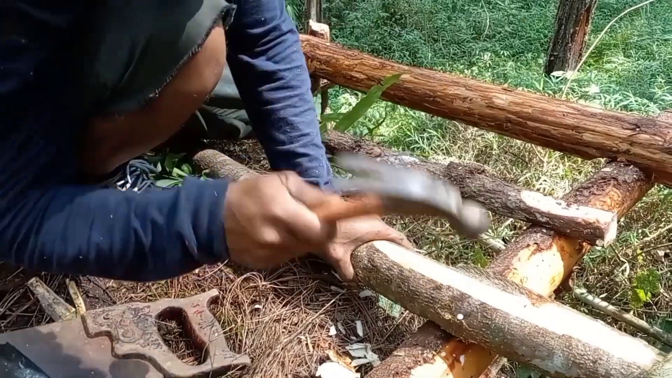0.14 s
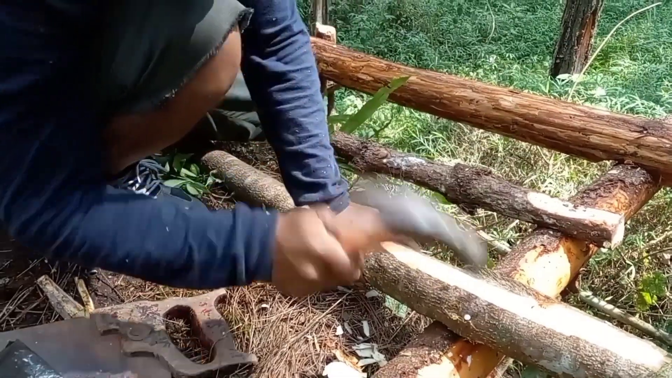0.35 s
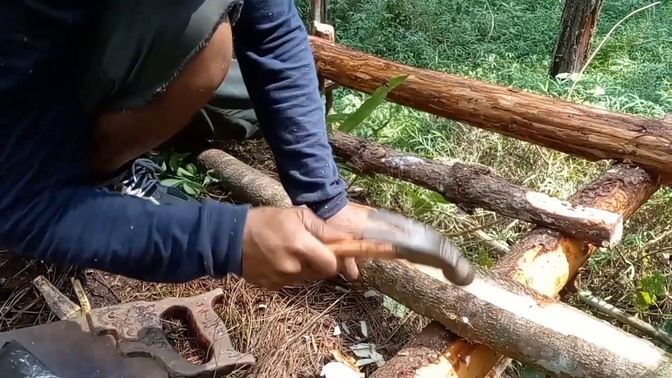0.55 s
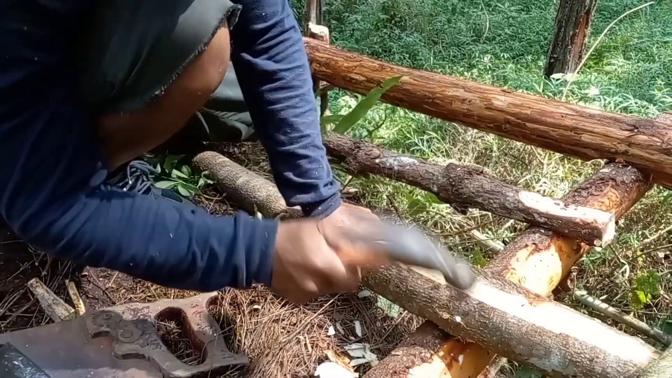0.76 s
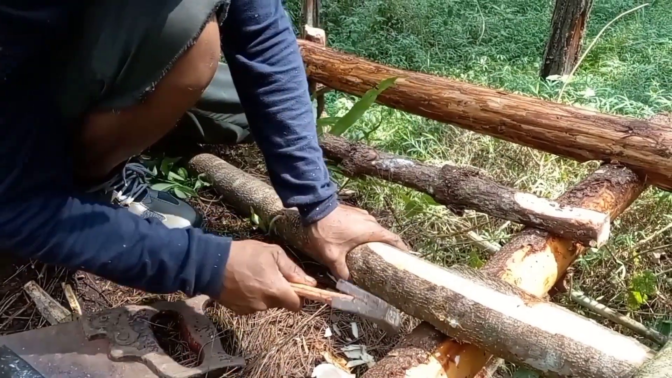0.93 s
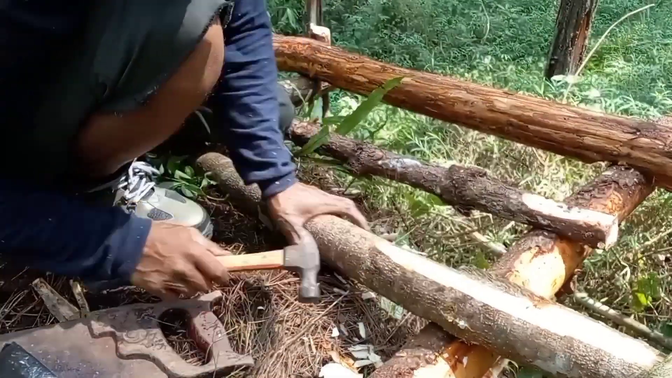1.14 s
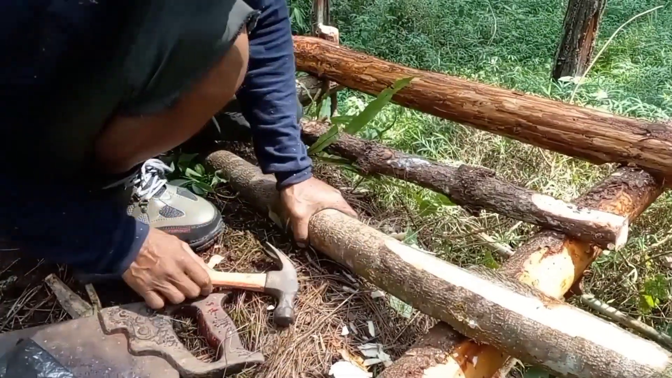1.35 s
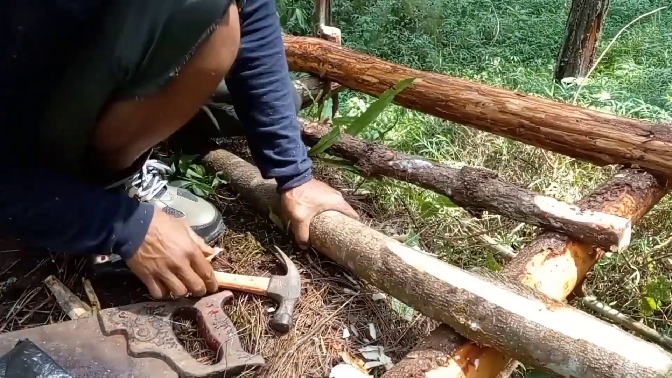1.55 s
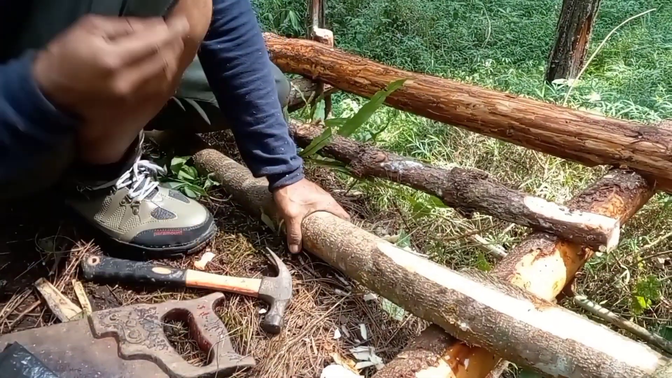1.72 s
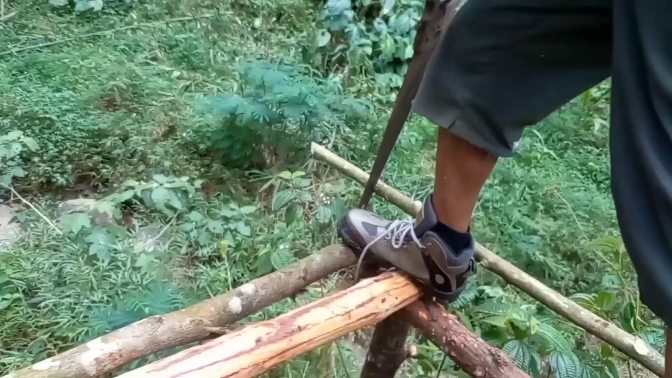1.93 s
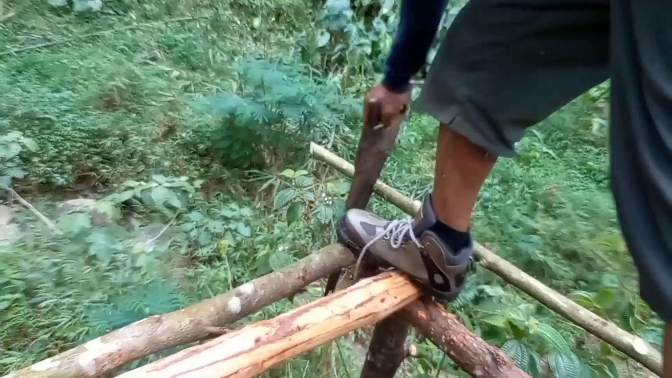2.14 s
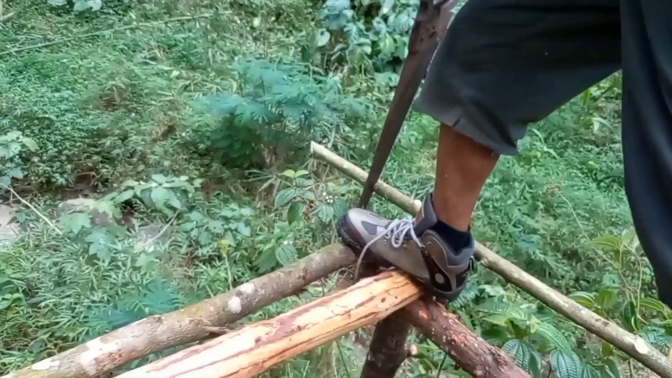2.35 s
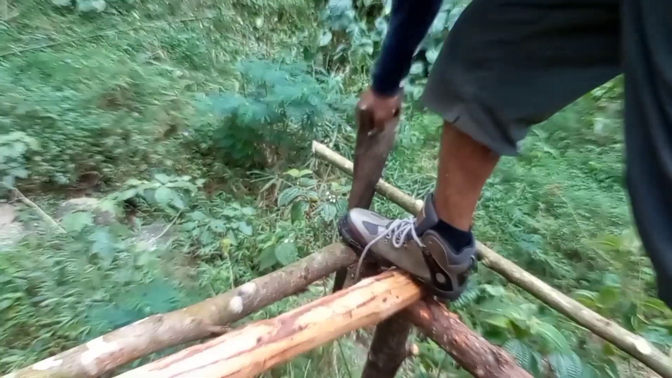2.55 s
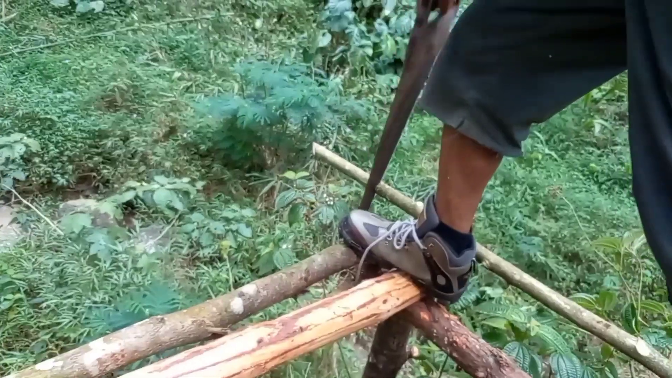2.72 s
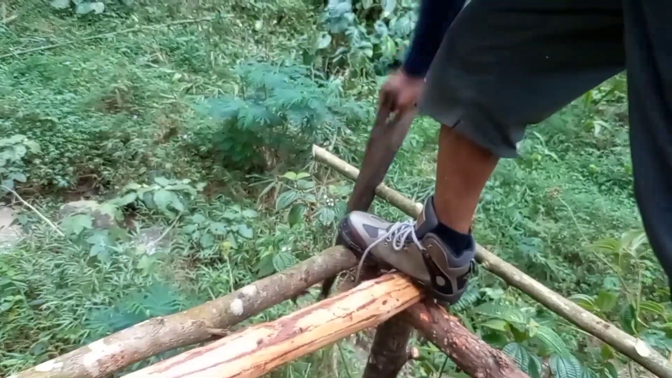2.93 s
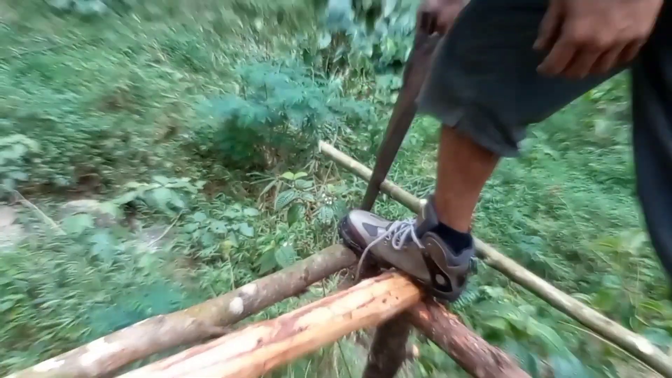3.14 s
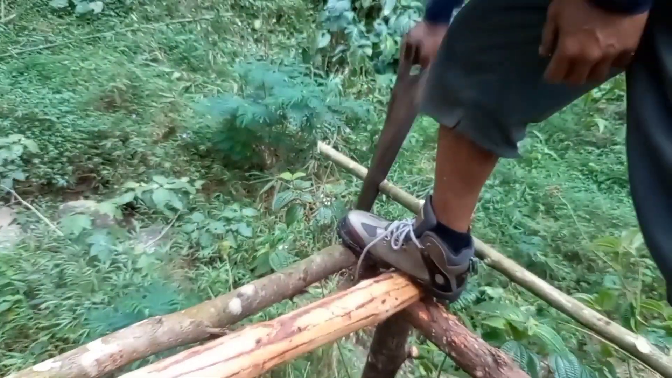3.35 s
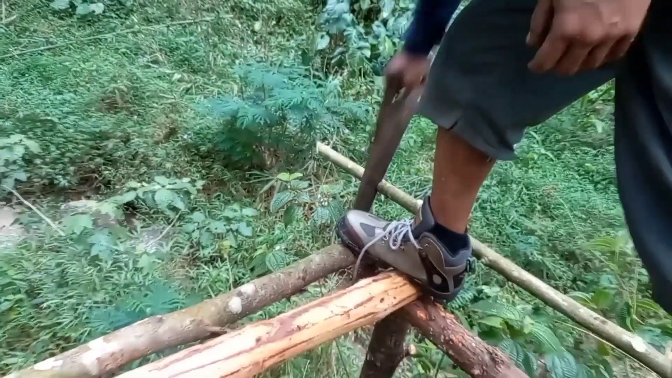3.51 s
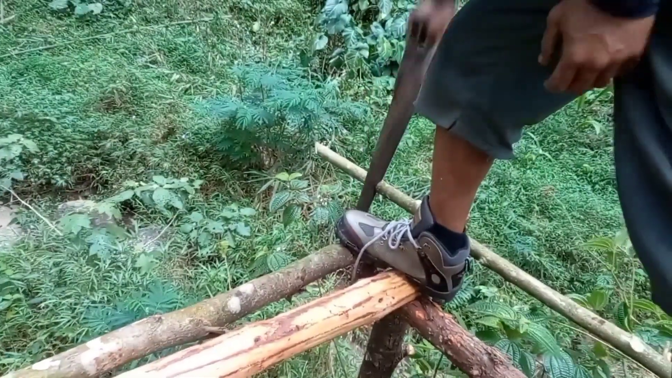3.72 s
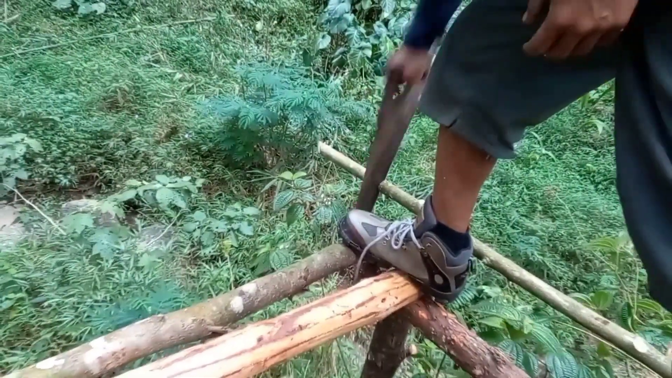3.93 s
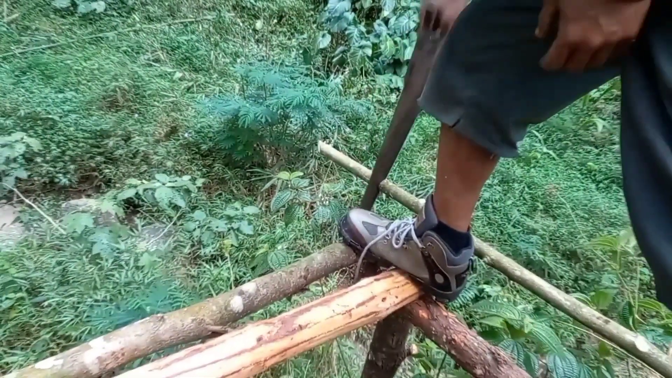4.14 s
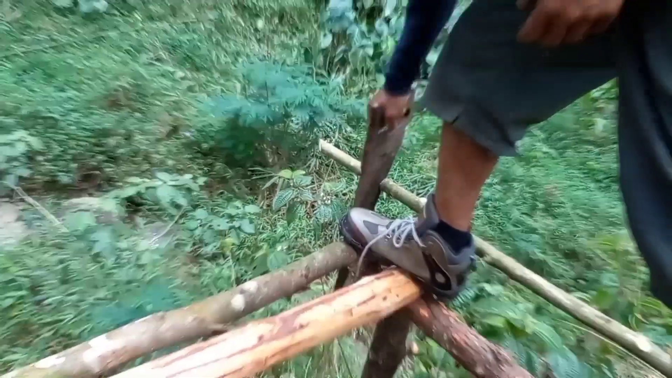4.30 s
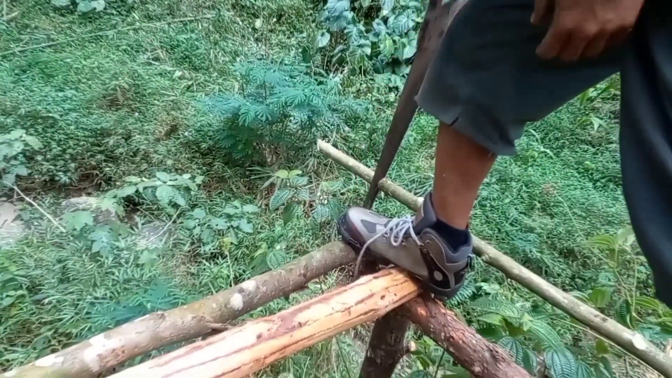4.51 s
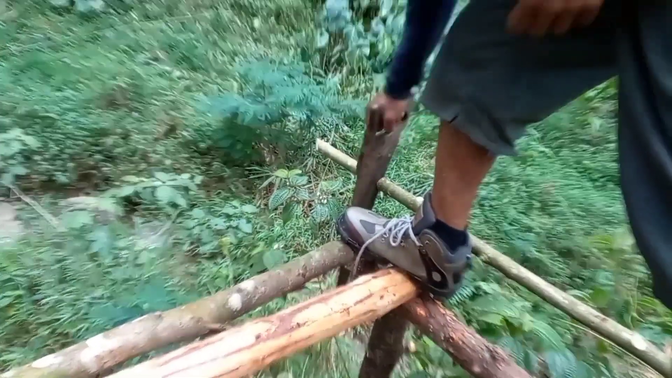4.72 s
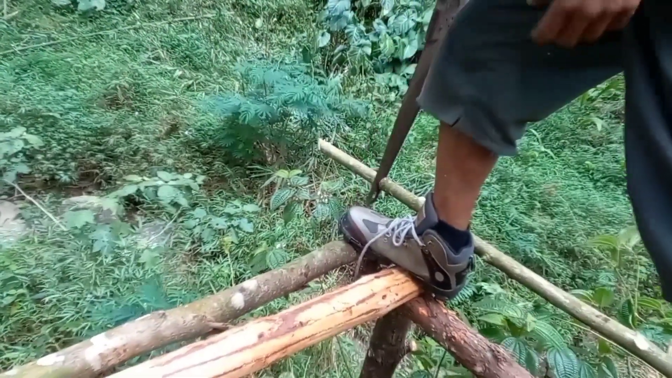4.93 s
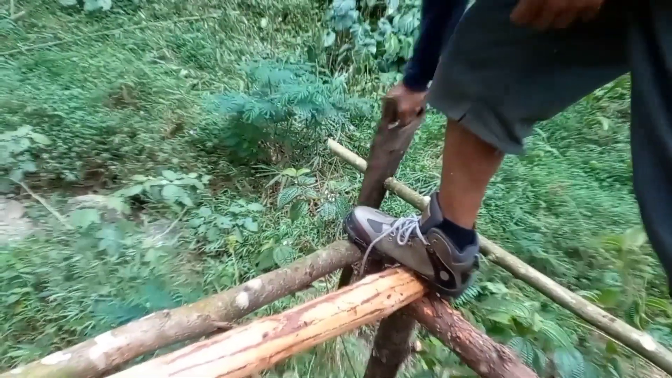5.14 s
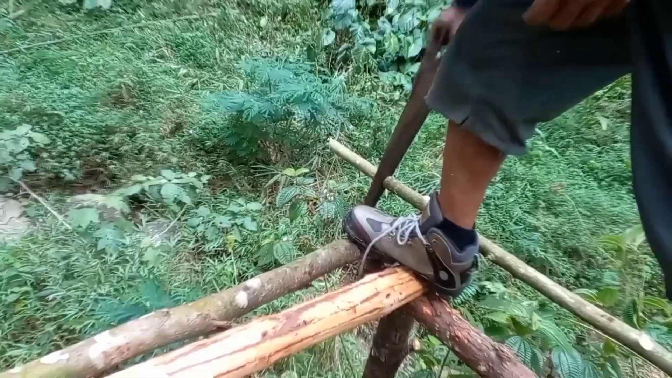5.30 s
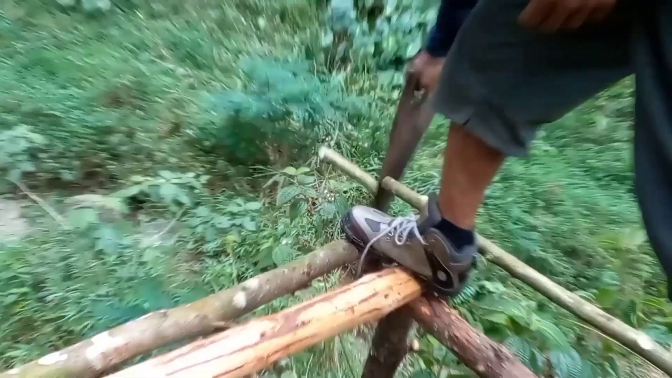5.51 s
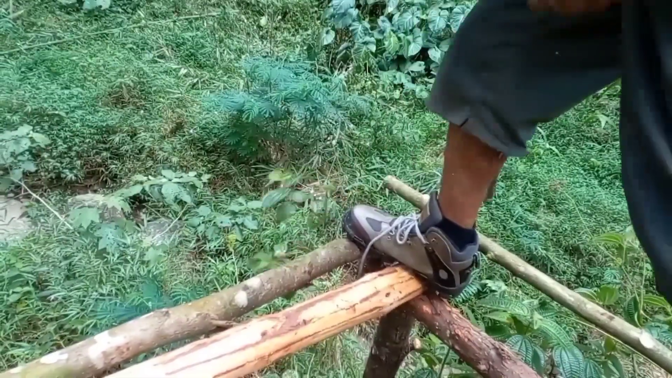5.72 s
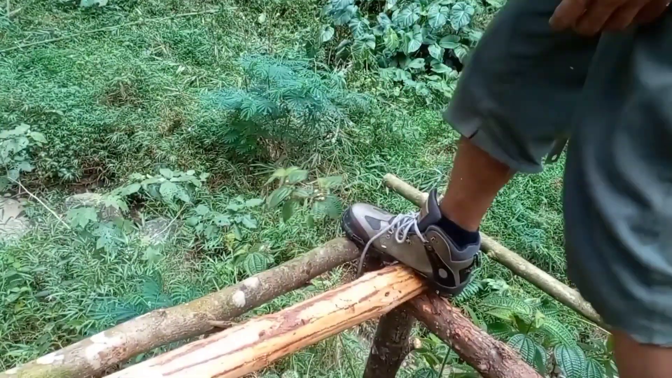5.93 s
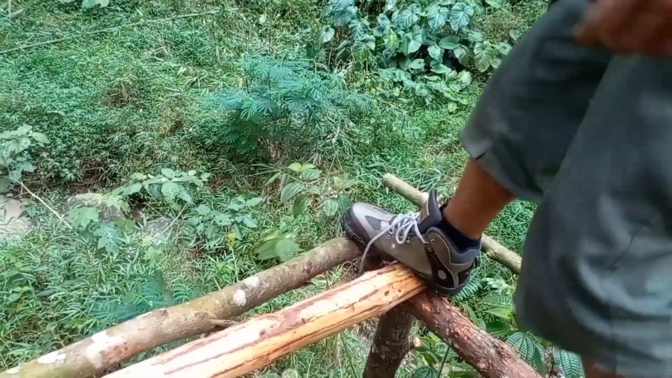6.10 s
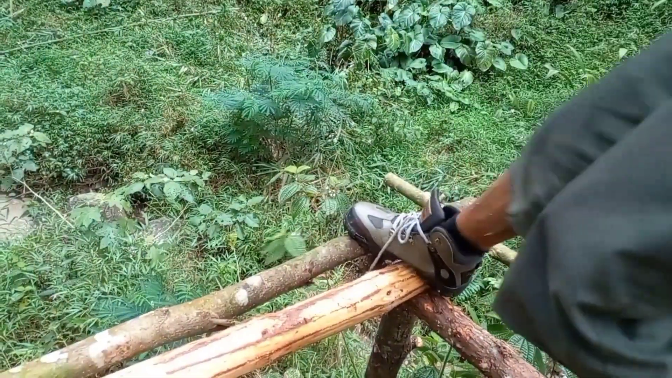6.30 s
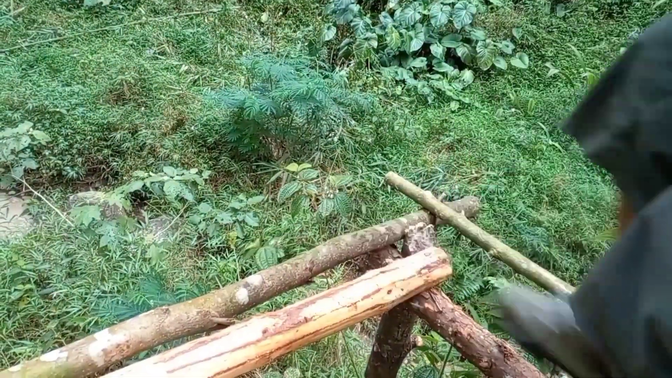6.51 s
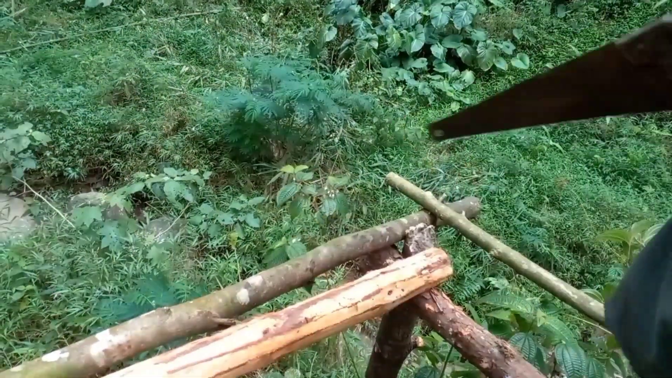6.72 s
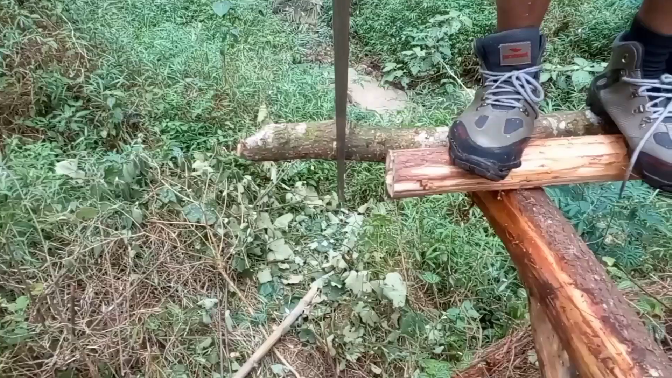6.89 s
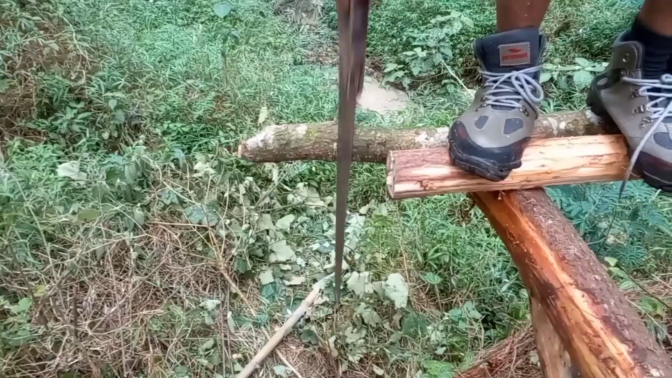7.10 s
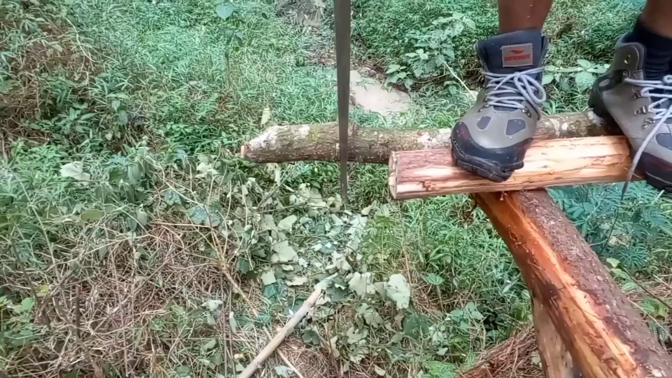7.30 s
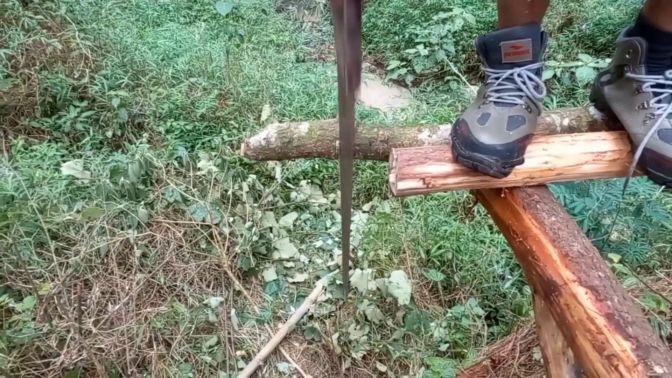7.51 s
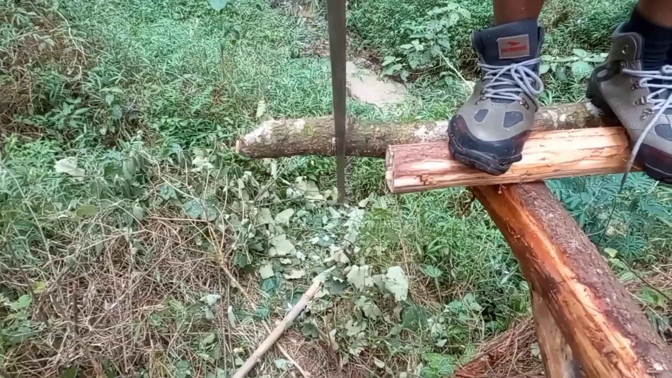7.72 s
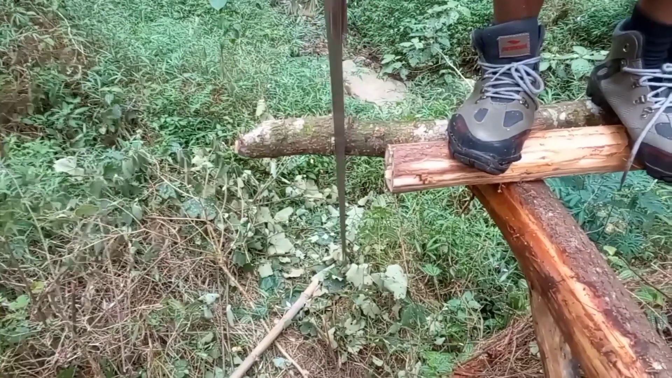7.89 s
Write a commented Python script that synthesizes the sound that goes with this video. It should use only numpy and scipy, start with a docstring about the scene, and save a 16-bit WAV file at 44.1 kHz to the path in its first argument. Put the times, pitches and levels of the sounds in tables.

```python
"""Outdoors, close by, insects sing over a soft forest hiss. Four hammer blows ring the modes of a
log, then the hammer drags over dry litter. A hand saw works to and fro through a pole: its teeth tear
fibres and ring the blade, which ticks as it turns, while the pole frame jolts in the bass. The blade
slides out, and faint knocks and rustles follow. After a brief silence, two last strokes bite into a
pole with broader resonances."""
import sys
import numpy as np
from scipy import signal
from scipy.io import wavfile
from scipy.ndimage import uniform_filter1d

SR = 44100
rng = np.random.default_rng(int(sys.argv[2]) if len(sys.argv) > 2 else 0)


def store_pcm(level_fs):
    """Save levels as 16-bit WAV."""
    pcm = np.round(np.clip(level_fs, -1, 1) * 32767).astype(np.int16)
    wavfile.write(sys.argv[1], SR, np.atleast_2d(pcm).T)


N = 350595
T = np.arange(N) / SR
LIFT_S = 6.22  # the blade slides out of the finished cut
SILENCE_START_S, SILENCE_END_S = 7.545, 7.63

# saw strokes, one list a cut, push and pull in turn
# (start [s], length [s], tearing level [dB], fastest moment [fraction of the stroke])
STROKES = [
    [(2.712, 0.13, -34, 0.5), (2.855, 0.21, -38, 0.45), (3.06, .2, -31.5, 0.57), (3.26, 0.22, -39.5, 0.54),
     (3.477, .19, -32, 0.61), (3.73, .21, -41, 0.41), (3.941, 0.19, -35, 0.67), (4.156, 0.2, -40, 0.49),
     (4.365, 0.18, -31.5, 0.68), (4.555, 0.23, -40, 0.53), (4.783, .2, -32, 0.6), (4.984, 0.23, -39, 0.57),
     (5.203, 0.2, -32, 0.64), (5.413, 0.23, -39, 0.6), (5.646, 0.22, -32, 0.63), (5.877, 0.22, -40, 0.56),
     (6.101, 0.12, -31.5, 0.78)],
    [(7.67, 0.21, -35.5, 0.63), (7.892, .2, -36.5, 0.57)],
]
# low modes of the blade and the pole (frequency [Hz], width [Hz], level [dB])
LOW_MODES = [(350, 56, 0.5), (523, 79, -4.5), (717.4, 85, -5.5), (1247, 70, -4), (1443, 31, -6.5),
             (1602, 88, -3.5), (1925, 85, -4), (2067, 90, -3), (2213, 76, -2), (2430, 25, -2),
             (2675, 68, -14.5), (3227, 76, -10.5), (3560, 52, -12.5)]


def undb(db):
    """Amplitude ratio of a level: tenfold for every 20 dB."""
    return 10 ** (np.asarray(db) / 20)


def unit(x):
    """Normalisation to rms 1."""
    return x / np.sqrt(np.mean(x ** 2))


def add(out, start_s, sound):
    """Superposition: a sound joins the mix at its start time."""
    i = int(start_s * SR)
    out[i:i + len(sound)] += sound[:N - i]


def fade(t, t60):
    """Exponential decay of 60 dB in t60 seconds."""
    return np.exp(-np.log(1000) * t / max(t60, .002))


def swell(peak_s, rise_s, fall_s):
    """Exponential growth and decay, 24 dB down one rise before and one fall after the peak."""
    return undb(-24 * np.maximum((peak_s - T) / rise_s, (T - peak_s) / fall_s))


def lagged(x, lag_s):
    """First-order relaxation towards x."""
    memory = np.exp(-1 / (lag_s * SR))
    return signal.lfilter([1 - memory], [1, -memory], x)


def drift(rate):
    """Random modulation: `rate` values a second, smoothed twice to a spread near 1."""
    hold = int(SR / rate)
    steps = np.repeat(rng.standard_normal(N // hold + 1), hold)
    return 1.275 * uniform_filter1d(uniform_filter1d(steps, hold), hold)[:N]


def grains(rate, spread_db):
    """Poisson process of clicks, most small, a few large."""
    size = undb(spread_db * rng.exponential(size=N)) * rng.choice([-1, 1], N)
    return size * (rng.random(N) < rate / SR)


def band(x, hz, width):
    """Second-order resonance with gain 1 at its centre."""
    return signal.lfilter(*signal.iirpeak(min(hz, .45 * SR), hz / width, SR), x)


def steep_band(x, hz, width):
    """Two equal resonances in cascade give steeper skirts."""
    return band(band(x, hz, width), hz, width)


def ring(x, modes, drift_db):
    """Forced vibration: modes of alternating sign swell and sink as the point of contact moves."""
    return unit(sum((-1) ** k * undb(db + drift_db * drift(rate=14)) * band(x, hz, width)
                    for k, (hz, width, db) in enumerate(modes)))


def tones(t, modes):
    """Free vibration: damped sines whose pitch and level vary a little from blow to blow."""
    chance = rng.standard_normal((len(modes), 2))
    return sum(undb(db + 2 * louder) * np.sin(2 * np.pi * hz * (1 + 0.022 * sharper) * t) * fade(t, t60)
               for (hz, db, t60), (sharper, louder) in zip(modes, chance))


def forest():
    """Broadband noise: half-octave bands of hiss waver independently."""
    # spectrum of the hiss (frequency [Hz], relative level [dB])
    spectrum = [(150, -9.5), (300, -2.5), (600, -9), (1200, -18.5), (2500, -19.5), (5000, -19),
                (8000, -23.5), (11000, -22.5), (14000, -15)]
    # course of the hiss (time [s], level [dB])
    course = [(0, -69), (6.3, -73.5), (7.95, -65)]
    hz, db = np.transpose(spectrum)
    hiss = np.zeros(N)
    for centre in 160 * 2 ** np.arange(0, 7, .5):
        gain = undb(np.interp(np.log(centre), np.log(hz), db) + drift(rate=25))
        hiss += gain * steep_band(rng.standard_normal(N), centre, centre / 2)
    return unit(hiss) * undb(np.interp(T, *np.transpose(course)))


def insects():
    """Amplitude modulation makes narrow bands of noise throb as insect song."""
    # songs (start [s], length [s], frequency [Hz], filter width [Hz], level [dB])
    songs = [(0, 2.72, 2870, 560, -79), (.3, 1.6, 2030, 200, -84), (.02, .12, 3800, 720, -72.5),
             (2.72, 4.83, 6620, 820, -81)]
    out = np.zeros(N)
    for start, length, hz, width, db in songs:
        song = unit(steep_band(rng.standard_normal(N), hz, width))
        singing = uniform_filter1d(1. * ((T > start) & (T < start + length)), size=1500)
        out += song * undb(db + 2.6 * drift(rate=12)) * singing
    return out


def scrapes():
    """Friction noise: needles and bark crackle under a dragged tool or shoe; dry leaves rustle above."""
    # drags over litter (peak time [s], rise [s], fall [s], crackle [dB], rustle [dB])
    drags = [(1.814, 0.32, 0.31, -92.5, -63.5), (1.99, 0.041, 0.17, -58, -64),
             (2.06, 0.11, 0.15, -54.5, -63), (2.17, .2, 0.092, -63.5, -80), (2.431, 0.12, .1, -82.5, -63),
             (2.495, 0.0086, 0.1, -44.5, -71.5), (6.764, 0.022, 0.082, -80, -57),
             (7.287, 0.01, 0.035, -75, -40.5), (7.346, 0.011, 0.062, -50.5, -58)]
    shapes = np.array([swell(*row[:3]) for row in drags])
    crackle_gain, rustle_gain = undb(np.transpose(drags)[3:]) @ shapes
    crackle = grains(5000, spread_db=2.5) * undb(1.7 * drift(rate=51))
    brush = grains(8000, spread_db=2.5) * undb(4.9 * drift(rate=22))
    needles = unit(steep_band(brush, 15000, 7000))
    leaves = unit(band(brush, 7000, 10700))
    rustle = np.where(T < 2.7, needles, leaves)  # fine by the log, coarser by the poles
    return crackle_gain * unit(band(crackle, 650, 730)) + rustle_gain * rustle


def ticks():
    """Impulse response of the blade or a twig: one damped mode with a bright snap."""
    # ticks (time [s], ring level [dB], ring frequency [Hz], ring t60 [s], snap level [dB])
    events = [(1.5998, -55.5, 1880, 0.02, -58.5), (2.5522, -41, 1850, 0.01, -71),
              (2.8569, -32, 3050, 0.015, -34), (3.274, -26, 3050, 0.0096, -35),
              (3.689, -35, 2180, 0.032, -25), (3.7685, -26.5, 3150, 0.025, -40),
              (3.8457, -30.5, 5840, 0.027, -26.5), (4.1665, -19, 3120, 0.0084, -29),
              (4.578, -42, 2200, 0.02, -37), (5.001, -39, 5850, 0.017, -29.5),
              (5.263, -54, 5900, 0.02, -39), (5.436, -37, 5040, 0.013, -33), (5.901, -40, 3020, 0.024, -27),
              (5.835, -50, 5600, 0.01, -24), (6.255, -45.5, 727, 0.17, -59),
              (6.3488, -39, 5740, 0.015, -40), (6.3769, -50, 3400, 0.064, -53),
              (6.4139, -64, 7000, 0.011, -44), (6.428, -39.5, 1070, 0.016, -57),
              (6.7475, -64, 3300, 0.018, -51.5), (7.1154, -51, 5530, 0.012, -42.5),
              (7.32, -55, 4000, 0.01, -49), (7.4042, -56, 2670, 0.024, -44),
              (7.8832, -36, 2990, 0.017, -58)]
    out, t = np.zeros(N), T[:SR // 10]
    for start, db, hz, t60, snap_db in events:
        snap = unit(band(band(rng.standard_normal(len(t)), 7800, 11600), 7690, 11600))
        snap *= fade(t, 0.0037) + 0.21 * fade(t, 0.027)
        if STROKES[0][0][0] < start < LIFT_S:  # a snagging tooth shakes the whole blade
            snap += undb(7) * sum(undb(mode_db) * band(snap, mode_hz, 3 * width)
                                  for mode_hz, width, mode_db in LOW_MODES if mode_hz > 1800)
        ping = np.sin(2 * np.pi * hz * t) * fade(t, t60) * np.minimum(t / 0.00095, 1)
        add(out, start, undb(db) * ping + undb(snap_db) * snap)
    return out


def frame():
    """Forced vibration: soft irregular shoves, each a few ms long, shake the low modes of the poles."""
    # modes of the pole frame (frequency [Hz], width [Hz], level [dB])
    modes = [(69.6, 39.7, -5.5), (106, 40, -1), (175, 77, -5.5), (247, 150, -9.5), (362, 100, -6.5)]
    # coupling of the sawing to the frame (time [s], gain [dB])
    coupling = [(2.7, -2), (3.5, -1), (3.86, 4), (3.98, -8), (4.1, 5.5), (4.74, -3), (5.07, 3), (5.22, -6),
                (5.8, -4), (6.23, -5), (6.34, -19), (7.95, -21.5)]
    # bass swells while the saw rests (peak time [s], rise [s], fall [s], level [dB])
    swells = [(.28, .5, 0.33, -63.5), (1.12, .6, 0.58, -66.5), (2.45, 0.21, 0.59, -62),
              (6.49, 0.14, 0.16, -59), (6.8, 0.2, 0.13, -58.5), (6.95, 0.03, 0.12, -53.5),
              (7.5, 0.43, 0.093, -48)]
    shoves = signal.lfilter(np.hanning(150), 1, grains(100, spread_db=2.0))
    load = lagged(tearing(), lag_s=0.053)
    load = load.max() * (load / load.max()) ** 0.63  # the frame evens out the strokes
    load *= undb(np.interp(T, *np.transpose(coupling)))
    rumble = undb(-77) + sum(undb(db) * swell(*shape) for *shape, db in swells)
    return (load + rumble) * ring(shoves, modes, drift_db=1.5)


def thumps():
    """Heavy damping: after a single hard shove the frame swings only a few times."""
    # shoves (time [s], level [dB], frequency [Hz])
    shoves = [(2.326, -53, 101.8), (2.809, -27, 114), (3.041, -24.5, 162), (3.161, -17.5, 350),
              (3.310, -18, 175), (3.460, -18, 168), (4.069, -21, 87), (4.077, -18, 196), (4.274, -31.5, 73),
              (4.357, -25, 86.5), (4.484, -23.5, 96), (5.042, -17, 175), (5.082, -20, 125),
              (5.584, -27.5, 124), (5.645, -28, 95), (5.819, -25, 360), (6.197, -28.5, 107.9),
              (6.944, -44.5, 161.7), (7.335, -24.5, 705), (7.405, -39, 70.4), (7.49, -32.5, 104)]
    out = np.zeros(N)
    for start, db, hz in shoves:
        cycles = hz * T[:SR // 10]
        swing = cycles / 0.79 * np.exp(1 - cycles / 0.57)
        add(out, start, -undb(db) * swing * np.sin(2 * np.pi * cycles))
    return out


def blow(peak_db, crack_db, tail_db, rebound_db, bass_tilt, contact_s, steel_db, sustain):
    """Impact: a force pulse rings the wood, the contact cracks and rebounds, the surroundings scatter."""
    # modes of the log (frequency [Hz], level [dB], t60 before sustain [s])
    log_modes = [(161, -11.5, 0.2), (317, -8, .09), (360, -14, 0.074), (425, -6.5, 0.13), (516, -7, .08),
                 (643, 1, 0.052), (760, -2.5, 0.045), (857, -3, 0.042), (940, -3.5, 0.022),
                 (1070, -4, 0.044), (1244, -9.5, 0.043), (1550, -8, 0.058), (1890, -11, 0.044),
                 (2470, -15, 0.032)]
    # modes of the steel head (frequency [Hz], level [dB], t60 [s])
    steel_modes = [(2951, -1, 0.021), (4850, -15.5, 0.022), (7400, -2, 0.016), (12100, -0.5, 0.013)]
    # scatter from trees and ground (frequency [Hz], early t60 [s], level [dB])
    scatter = [(100, 0.2, -2.5), (243, 0.17, -6), (477, 0.075, 8.5), (1040, 0.082, 5.5), (1994, 0.21, -4),
               (3950, 0.049, -4), (8000, 0.24, -6), (13000, 0.064, -9.5)]
    t = T[:SR // 2]
    wood = tones(t, [(hz, db - bass_tilt * np.log2(hz / 600), sustain * t60)
                     for hz, db, t60 in log_modes])
    # the log chatters on its supports, so the force comes as a short train
    n = SR // 20
    chatter = rng.standard_normal(n) * (rng.random(n) < 1500 / SR) * 0.61 * fade(t[:n], 0.091)
    chatter[0] = 1
    force = np.convolve(np.hanning(int(contact_s * SR) + 3), chatter)
    wood = signal.fftconvolve(wood, force)[:len(t)]
    # the wood sounds little deep bass below about 110 Hz
    wood = signal.sosfilt(signal.butter(2, 110, "high", fs=SR, output="sos"), wood)
    wood = undb(peak_db) * wood / np.abs(wood).max()
    burst = unit(band(rng.standard_normal(len(t)), 7300, 14000))
    burst *= fade(t, .016) + 0.77 * fade(t, 0.0063)
    crack = undb(crack_db) * (burst + undb(steel_db) * tones(t, steel_modes))
    rebound = undb(rebound_db) * np.roll(wood + 0.3 * crack, int(.018 * SR))
    tail = np.zeros(len(t))
    for hz, t60, db in scatter:
        noise = unit(band(rng.standard_normal(len(t)), hz, 1.2 * hz))
        tail += undb(db) * noise * (fade(t, t60) + .12 * fade(t, 3.5 * t60))
    return wood + crack + rebound + undb(peak_db + tail_db) * tail * np.minimum(t / 0.0021, 1)


def hits():
    """Impact excitation: hammer blows ring both wood and steel, duller knocks mostly wood."""
    # hammer blows on the log (time [s], wood peak [dB], crack [dB], tail re wood peak [dB],
    # rebound gain [dB], bass tilt [dB/octave])
    blows = [(.1760, -18, -16, -20.5, -13, 2.5), (0.5613, -15.5, -14, -21, -13.5, -0.06),
             (0.9827, -8.5, -11, -26, -6.5, -0.06), (1.4183, -11, -11, -23.5, -14, 2.5)]
    # knocks on the poles, same columns
    knocks = [(0.068, -51.5, -57, -20, -19, 3.5), (0.311, -53.5, -54.5, -14.5, -22, -4),
              (2.492, -36.5, -60, -35, -2, -2.2), (3.768, -9.5, -45, -27.5, -3, -1.5),
              (6.427, -47.5, -64, -16, -24, -11.5), (6.938, -50, -53.5, -27.5, -8, 4.5),
              (7.209, -54, -68, -32, -8, 6)]
    out = np.zeros(N)
    for start, *levels in blows:
        add(out, start, blow(*levels, contact_s=0.00036, steel_db=-2.5, sustain=1.2))
    for start, *levels in knocks:
        add(out, start, blow(*levels, contact_s=0.00024, steel_db=-38.5, sustain=1.34))
    return out


def tearing():
    """Tearing amplitude follows a saturating power law of blade speed; pushes bite, pulls skim."""
    push_powers, pull_powers = (1, 1.83), (2.28, 1.86)  # exponents (speeding up, slowing down)
    saturation = 1.13  # the teeth near full depth early and stay there
    out = undb(-50.5) * (T > LIFT_S) * fade(np.abs(T - LIFT_S), t60=0.38)  # the blade slides out
    for cut in STROKES:
        middles = [start + length / 2 for start, length, *_ in cut]
        out += undb(-61) * ((T > middles[0]) & (T < middles[-1]))  # the teeth still rub at each turn
        for k, (start, length, db, fastest) in enumerate(cut):
            skew = np.log(.5) / np.log(np.clip(fastest, .1, .9))
            travel = np.clip((T - start) / length, 0, 1) ** skew
            speed = np.abs(np.sin(np.pi * travel))
            power = np.where(travel < .5, *(pull_powers if k % 2 else push_powers))
            out += undb(db - 2) * np.tanh(saturation * speed ** power) / np.tanh(saturation)
    return out


def judder():
    """Stick-slip modulation in dB: a sudden bite, then the teeth skate until the next."""
    # runs of skipping at a steady beat (start [s], length [s], bite rate [Hz], depth [dB])
    runs = [(2.899, 0.088, 43, 5), (3.76, 0.081, 27, 11), (4.22, .08, 38.5, 6), (5.067, .11, 30, 5),
            (5.248, 0.065, 47, 3), (5.49, .035, 28, 4), (5.527, 0.074, 58, 8), (5.945, 0.12, 38, 13)]
    bite_decay = .4  # in beats
    out = np.zeros(N)
    for start, length, rate, depth_db in runs:
        beat = (T - start) * rate % 1
        out += depth_db * (np.exp(-beat / bite_decay) - bite_decay) * ((T > start) & (T < start + length))
    return uniform_filter1d(out, size=90)


def saw():
    """Source and filter: teeth tear fibres in uneven bunches, and the clicks ring blade and pole."""
    # high modes of the blade (frequency [Hz], width [Hz], level [dB])
    high_modes = [(3330, 490, -9), (4354, 290, -5), (5630, 580, -1), (6600, 670, -3.5), (7500, 810, -2.5),
                  (10950, 1650, 0), (11990, 1650, 2), (15100, 3300, -2)]
    # broader modes of the last pole, same columns
    last_pole_modes = [(402, 72, 1.5), (1370, 280, 1), (2030, 650, -4), (2790, 440, -3.5)]
    tear = tearing()
    bite = undb(judder() + 0.9 * drift(rate=60) + 2.1 * drift(rate=250))
    blade = ring(grains(6000, spread_db=2.0), high_modes, drift_db=0.8)
    teeth = grains(2500, spread_db=1.0)
    first_pole = ring(teeth, LOW_MODES, drift_db=2.0) + undb(-7) * unit(band(teeth, 1710, 3300))
    last_pole = ring(teeth, last_pole_modes, drift_db=1.5)
    pole = np.where(T < SILENCE_END_S, undb(-4) * first_pole, undb(-6) * last_pole)
    # the heavier pole follows the stroke late and rings on through each turn
    sway = lagged(tear, lag_s=.013) * undb(0.6 * drift(rate=7.6))
    return bite * (tear * blade + sway * pole)


def scene():
    """Superposition of all sources at one microphone."""
    return (saw() + frame() + thumps() + hits() + ticks() + scrapes() + forest() + insects())[None]


def record(dry):
    """Band limiting trims bass and top, soft clipping rounds peaks; a silence precedes the last strokes."""
    drive, top_hz = 1.6, 15420
    thin = signal.sosfilt(signal.butter(2, 45, "high", fs=SR, output="sos"), dry)
    rounded = np.tanh(drive * thin) / drive
    gate = uniform_filter1d(1. * ((T < SILENCE_START_S) | (T > SILENCE_END_S)), size=120)
    return signal.sosfilt(signal.ellip(10, .2, 70, top_hz, fs=SR, output="sos"), rounded * gate)


dry = scene()
out = record(dry)
store_pcm(out)
```